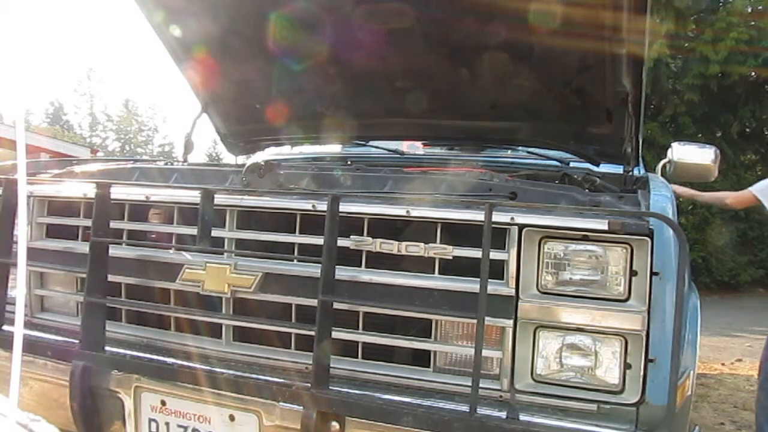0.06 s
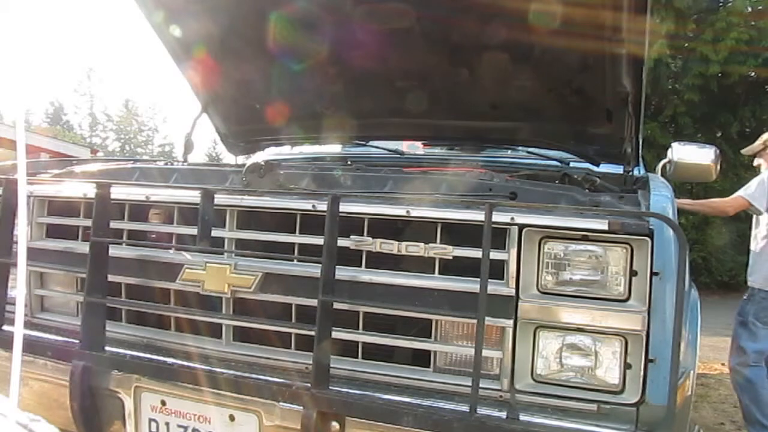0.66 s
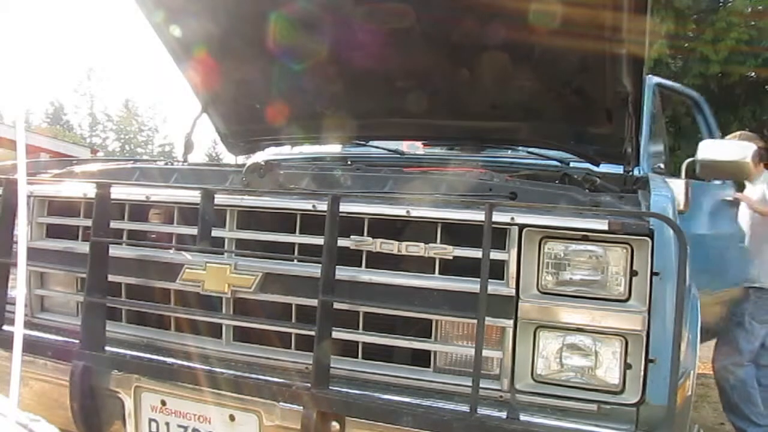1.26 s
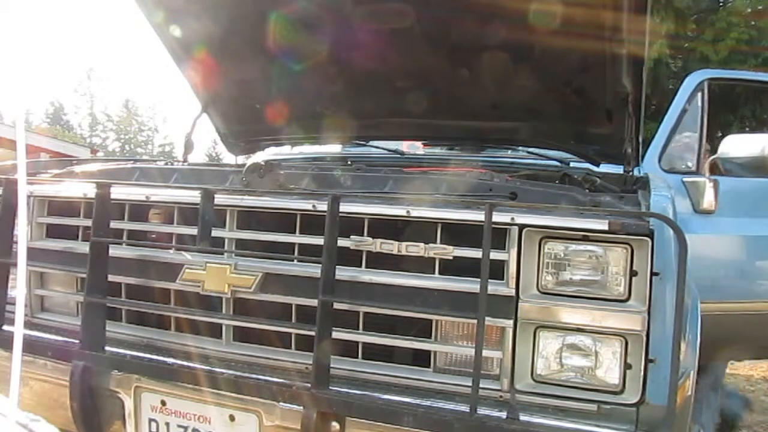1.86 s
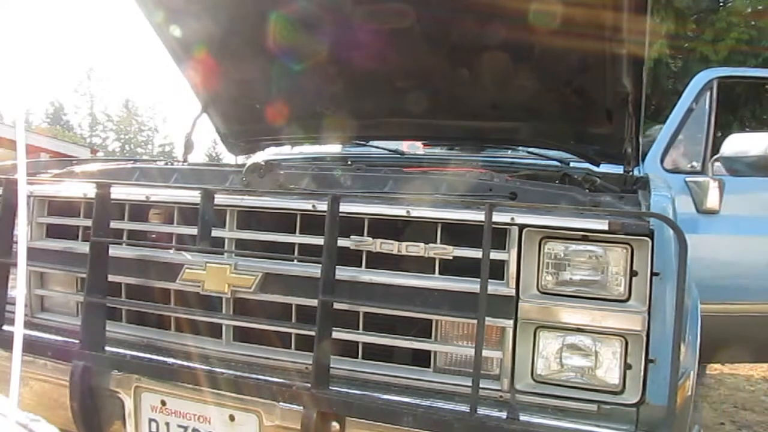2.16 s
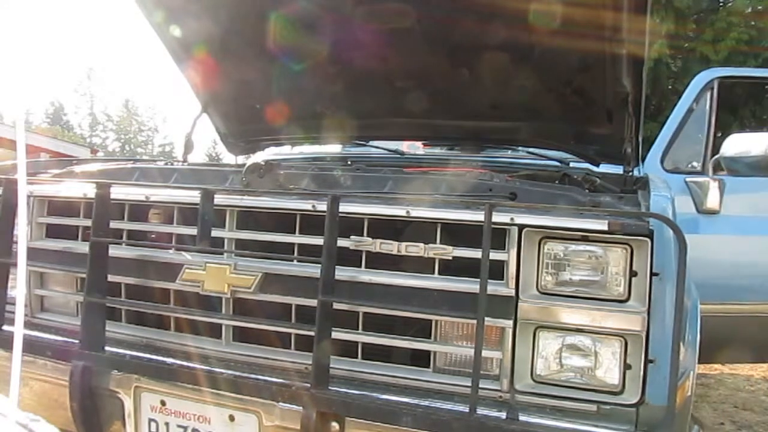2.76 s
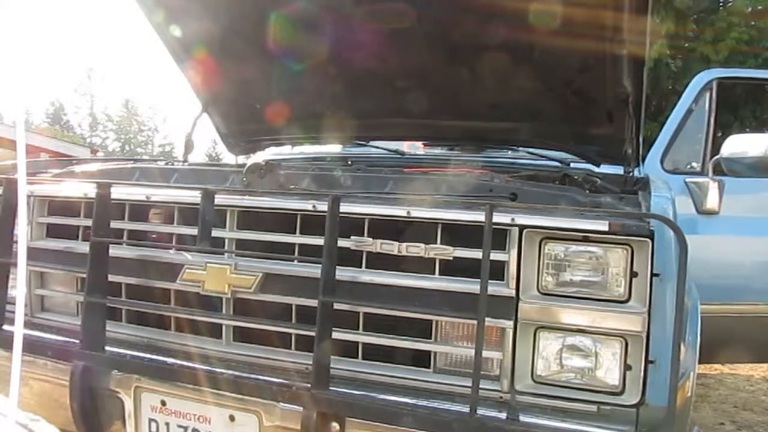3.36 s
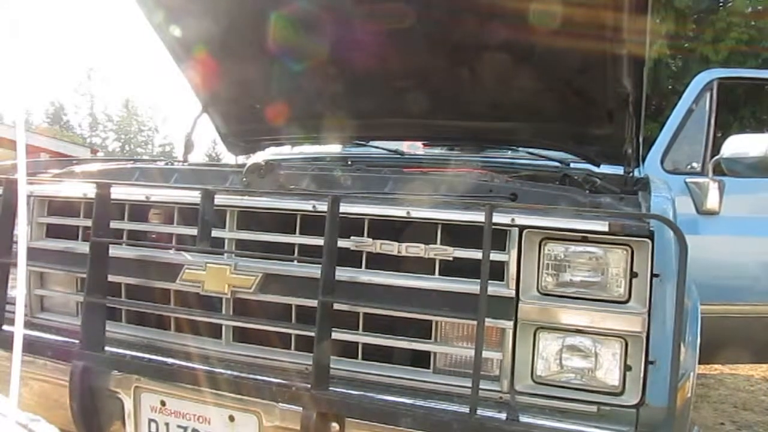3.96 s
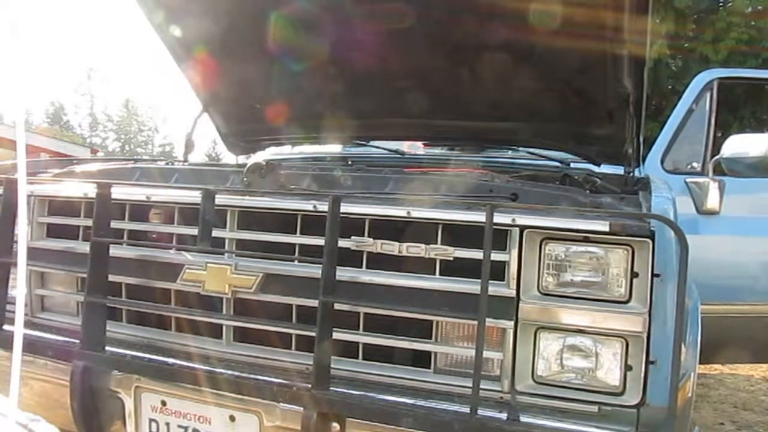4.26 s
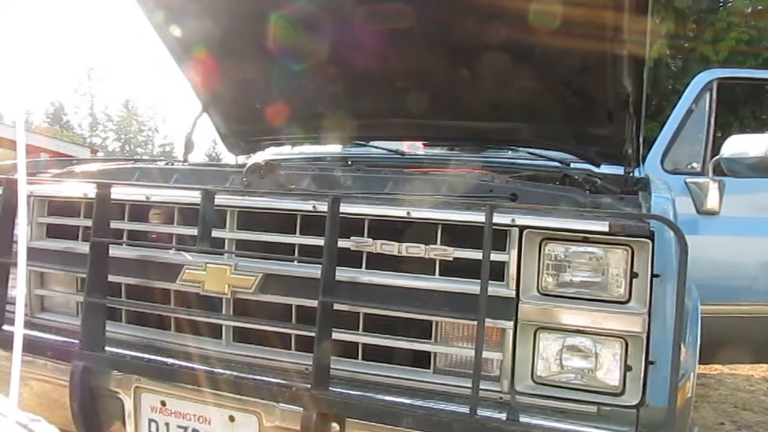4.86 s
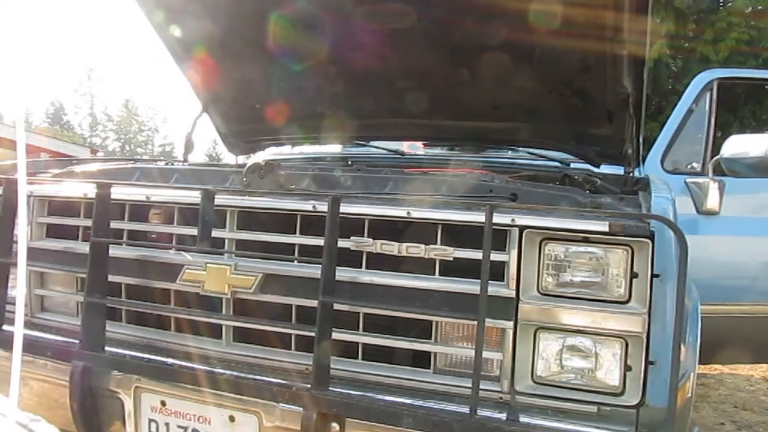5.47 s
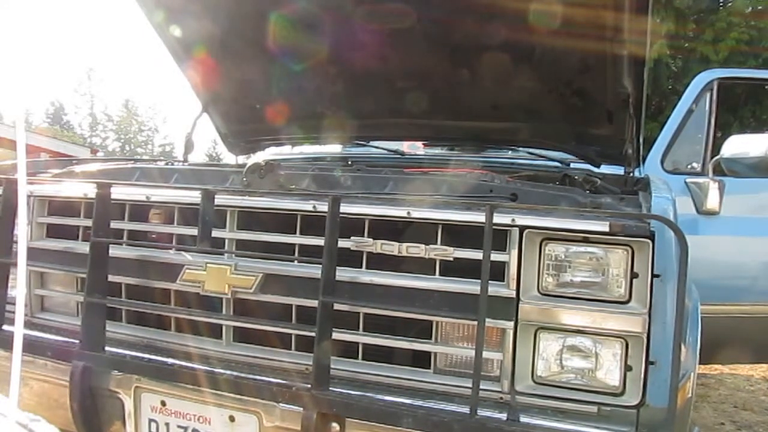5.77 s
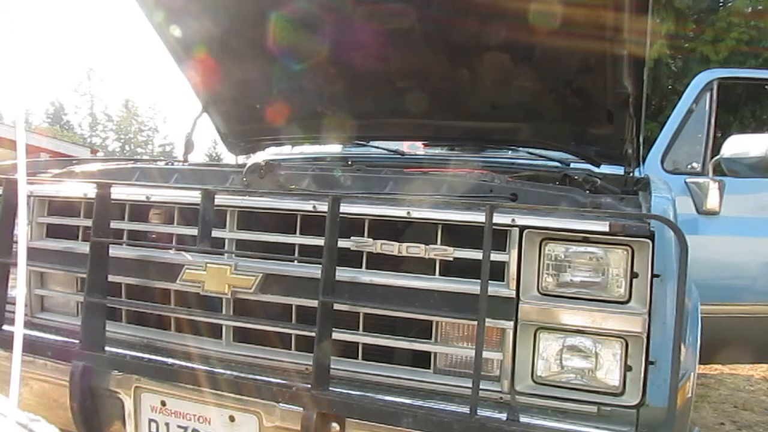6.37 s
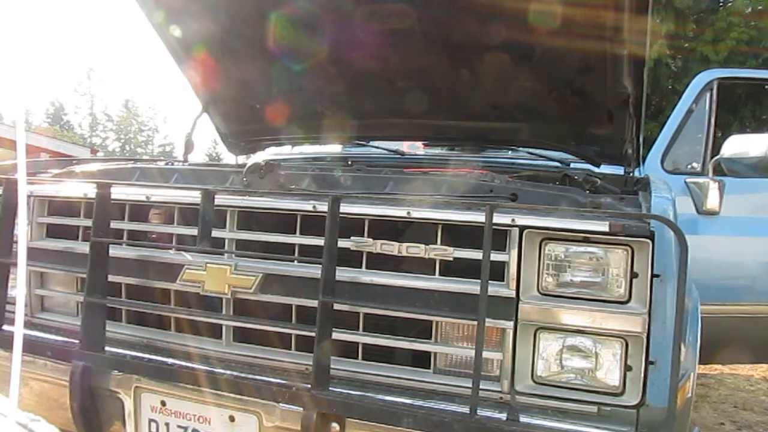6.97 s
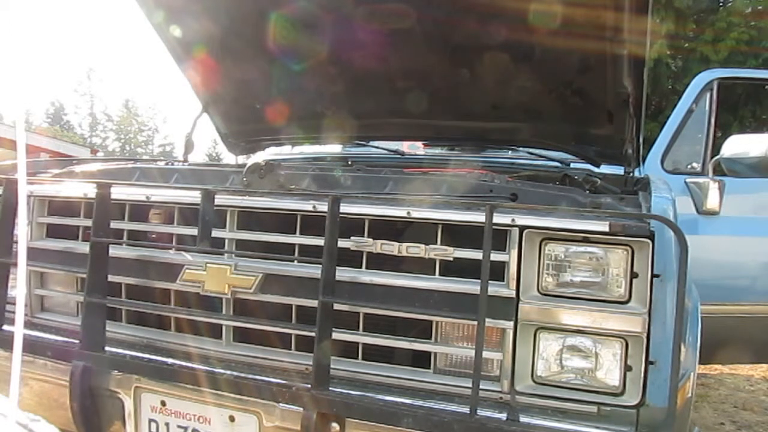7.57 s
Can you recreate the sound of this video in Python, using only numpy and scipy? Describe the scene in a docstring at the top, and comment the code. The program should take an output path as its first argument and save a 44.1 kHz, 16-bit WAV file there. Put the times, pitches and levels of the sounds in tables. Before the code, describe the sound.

A faint outdoor hiss runs throughout, heard from in front of an old pickup. At about 0.6 seconds the door handle clicks, and at 0.8 the latch scrapes free with a bright metallic chirp. From 1.2 to 1.7 seconds the dry hinge gives two high, wavering squeals, slightly to the right, then drops into a lower, rasping groan that stops at 2.1. Light, scattered knocks and clicks come from the door and cab until about 4.9 seconds, some with a brief ring of loose metal, and a soft, dull scuff passes around 4.2. At 5.6 seconds a catch snaps once, sharp, dry and close, the loudest sound of all. A faint squeak follows at 6.1 as a light breeze nudges the microphone with low, soft bumps. Hiss remains, with one more small puff near 7.5 seconds.

```python
"""An old pickup's door opens outdoors, heard from in front of the bonnet, over hiss and a light breeze.
The handle clicks and the latch scrapes free (0.8 s). The dry hinge squeals twice (1.2-1.7 s), then
drops into a slower stick-slip groan that shakes the panel and stops (2.1 s). Door and cab knock, loose
fittings ring, and a soft scuff passes (4.2 s). A catch snaps, sharp and close (5.6 s); a faint squeak
follows (6.1 s) as the breeze nudges the microphone."""
import sys
import numpy as np
from scipy import signal
from scipy.fft import rfft, irfft, next_fast_len
from scipy.io import wavfile
from scipy.ndimage import uniform_filter1d, map_coordinates

SR = 44100
rng = np.random.default_rng(int(sys.argv[2]) if len(sys.argv) > 2 else 0)


def pcm_store(signal):
    """Save signal as 16-bit PCM."""
    levels = np.round(np.clip(np.atleast_2d(signal), -1, 1) * 32767)
    wavfile.write(sys.argv[1], SR, levels.astype(np.int16).T)


N = 335437

# hinge stick-slip: time_s, slip_rate_hz, roughness (0-1)
GROAN_CURVE = [(1.715, 451, .8), (1.765, 425.5, 0), (1.846, 401.5, 0.05), (1.853, 322.4, .6),
               (1.889, 311.4, 0.12), (1.96, 316.2, 0.04), (1.982, 334.8, 0.84), (2.025, 309.5, .9),
               (2.034, 468, 0.5), (2.116, 478, 0.41)]


def amp(db):
    """Decibels to gain."""
    return 10 ** (np.asarray(db) / 20)


def unit(x):
    """Scale to rms 1."""
    return x / np.sqrt(np.mean(x ** 2) + 1e-20)


def steady(x):
    """Scale to a running rms of 1."""
    return x / np.sqrt(np.abs(uniform_filter1d(x ** 2, size=700)) + 1e-12)


def along(points, hz):
    """Interpolate (freq_hz, value) points on a log axis."""
    freq_hz, values = np.transpose(points)
    return np.interp(np.log(hz + 1), np.log(freq_hz + 1), values)


def curves(rows):
    """One value per sample for each column after time_s."""
    time_s, *columns = np.transpose(rows)
    return [np.interp(np.arange(N) / SR, time_s, column) for column in columns]


def during(rows):
    """True between a table's first and last time."""
    t = np.arange(N) / SR
    return (t > rows[0][0]) & (t < rows[-1][0])


def wobble(rate_hz):
    """Smooth random curve with knots at rate_hz."""
    knots = rng.standard_normal(int(N * rate_hz / SR) + 4)
    return map_coordinates(knots, [np.arange(N) * rate_hz / SR])


def filtered(x, response):
    """Apply a complex frequency response."""
    n = x.shape[-1]
    size = next_fast_len(n + 8192)
    return irfft(rfft(x, size) * response(np.fft.rfftfreq(size, 1 / SR)), size)[..., :n]


def coloured(x, colour):
    """Shape by (freq_hz, gain_db) points."""
    return filtered(x, lambda hz: amp(along(colour, hz)))


def noise(colour, size):
    """Coloured noise, rms 1."""
    return unit(coloured(rng.standard_normal(size), colour))


def dying(x, decay):
    """Decay each band by (freq_hz, t60_s) points."""
    hz, t, bands = signal.stft(x, SR, nperseg=128)
    return signal.istft(bands * amp(-60 * t / along(decay, hz)[:, None]), SR)[1][..., :x.shape[-1]]


def add(track, start_s, sound):
    """Mix a sound into a track."""
    start = round(start_s * SR)
    track[start:start + len(sound)] += sound[:N - start]


def placed(x, left_db, lag_samples):
    """Pan by the left channel's level and lag against the right."""
    ports = np.array([[.5], [-.5]])
    return filtered(x, lambda hz: amp(ports * left_db) * np.exp(-2j * np.pi * hz * ports * lag_samples / SR))


def air(hiss_db=-52.5):
    """Distant trees and roads: low wash and hiss, narrowest in the midrange."""
    # wash over time: time_s, level_db
    wash_curve = [(0, -56), (1, -52.5), (2.3, -50), (3.5, -54.5), (4.3, -55.5), (7.61, -59)]
    # spectra: freq_hz, gain_db
    wash_colour = [(30, -69), (120, -41.5), (250, -15.5), (450, -6.5), (750, 1), (1300, -1), (1700, -10),
                   (3000, -60.5), (7000, -120)]
    hiss_colour = [(710, -25.5), (1200, -11.5), (1340, -5), (1440, -2), (1560, -2.5), (2180, -0.5),
                   (3250, -6), (3910, -16), (4700, -9.5), (7250, -15), (9410, -25), (13700, -47),
                   (16000, -77)]
    # stereo width: freq_hz, side_to_mid_db
    width = [(200, -1), (400, -5.5), (700, -7.5), (1300, -6), (2400, -8.5), (4400, -6.5), (8000, -2),
             (14000, 4.5)]

    def wide(colour):
        return noise(colour, N) + np.outer([1, -1], coloured(noise(colour, N), width))

    wash_db, = curves(wash_curve)
    hiss = coloured(wide(hiss_colour), [(100, -30.5), (600, 0)])
    return wide(wash_colour) * amp(wash_db + 0.37 * wobble(5.7)) + hiss * amp(hiss_db)


def rumble_gain(return_db_per_s=12.5, edge_s=0.03, floor_db=-70.5):
    """Wind rumble cuts out after a strong buffet, then slowly returns, like an automatic wind filter."""
    # stretches of rumble: cut_s, length_s, final_db
    stretches = [(.99, 1, -44.5), (4.44, 1.66, -41.5), (4.64, 0.09, -54), (6.39, 1.4, -43.5),
                 (7.5, 0.5, -61.5)]
    t, gain = np.arange(N) / SR, amp(floor_db)
    for cut_s, length_s, final_db in stretches:
        gate = np.clip(np.minimum(t - cut_s + length_s, cut_s - t) / edge_s + 1, 0, 1)
        gain = gain + gate * amp(final_db - return_db_per_s * np.abs(cut_s - t))
    return gain


def breeze(lumps_db=2.5, mid_flutter_db=-9, dip_gain=0.17):
    """Flutter and single eddies push the two microphone ports, mostly in opposite directions."""
    # wind spectrum: freq_hz, gain_db
    flutter_colour = [(20, -13), (60, -1), (130, 0.5), (300, -3), (550, -12.5), (1000, -26), (2500, -42.5),
                      (6000, -120)]
    # strongest eddies: centre_s, peak_db, freq_hz
    eddies = [(0.981, -29, 89.5), (4.428, -31.5, 60.3), (6.09, -27, 79), (6.149, -24.5, 108),
              (6.365, -23, 112), (7.49, -28.5, 94)]
    gain = rumble_gain() * amp(lumps_db * wobble(30))
    t = np.arange(-SR // 20, SR // 20) / SR
    pushes, dips = np.zeros((2, N))
    for centre_s, peak_db, hz in eddies:
        u = 2 * np.pi * hz * t
        bell = amp(peak_db) * np.exp((1 - u * u) / 2)
        add(pushes, centre_s + t[0], -u * bell)  # push, then suction
        add(dips, centre_s + t[0], (1 - u * u) * bell)  # pressure dip at both ports
    side = gain * noise(flutter_colour, N) + pushes
    mid = gain * noise(flutter_colour, N) * amp(mid_flutter_db) + dip_gain * dips
    return np.array([mid + side, mid - side])


def yard(x):
    """Truck body, ground and trees scatter a short stereo tail."""
    # tail decay: freq_hz, t60_s
    decay = [(200, 0.17), (1500, 0.28), (6000, 0.13), (14000, 0.076)]
    tail = dying(rng.standard_normal((2, SR // 3)), decay)
    delayed = np.pad(x, (200, 0))
    mid, side = signal.fftconvolve(delayed[None], tail / np.linalg.norm(tail[0]), axes=1)[:, :N]
    return np.array([mid + 0.67 * side, mid - 0.18 * side])


def scuff(centre_s=4.2, sigma_s=0.17, level_db=-51):
    """A dull rub swells and fades."""
    # rub spectrum: freq_hz, gain_db
    colour = [(100, -12), (300, 1), (650, -1), (1100, -10), (3000, -41)]
    t = np.arange(N) / SR
    return noise(colour, N) * amp(level_db) * np.exp(-((t - centre_s) / sigma_s) ** 2 / 2)


def steel_mode(hz, spread_hz, rise_s, t60_s):
    """One steel mode of unsteady pitch swells and dies."""
    t = np.arange(SR // 2) / SR
    drift = unit(uniform_filter1d(rng.standard_normal(len(t)), size=36))
    phase = 2 * np.pi * np.cumsum(hz + spread_hz * drift) / SR
    envelope = np.minimum(t / rise_s, 1) ** 2 * amp(-60 * np.maximum(t - rise_s, 0) / t60_s)
    return np.sin(phase) * envelope


def rings(squeak_s=6.09, squeak_hz=3040, squeak_db=-50):
    """Jolted fittings and panels ring briefly; one squeaks faintly for longer."""
    # loose steel: start_s, pitch_hz, level_db
    modes = [(1.161, 8900, -32.5), (1.382, 5000, -31), (1.394, 575, -37), (1.478, 530, -39.5),
             (2.172, 131, -39), (2.819, 2420, -37), (3.148, 1090, -38.5), (3.148, 1880, -39),
             (4.626, 913, -38.5)]
    out = np.zeros(N)
    for start_s, hz, db in modes:
        add(out, start_s, amp(db) * steel_mode(hz, spread_hz=47 + 0.029 * hz, rise_s=0.0052, t60_s=0.09))
    add(out, squeak_s, amp(squeak_db) * steel_mode(squeak_hz, spread_hz=75, rise_s=0.058, t60_s=1.0))
    return out


def contact(levels_db, rise_s, middle_t60_s):
    """One contact stirs dense, damped door modes in three bands; the lowest lasts longest."""
    # band spectra: freq_hz, gain_db
    treble = [(1800, -9.5), (3000, -0.5), (4000, -5.5), (5500, 0.5), (8000, -5.5), (10000, -15),
              (13000, -32), (16000, -35)]
    middle = [(120, -52), (300, -17), (620, -2.5), (850, 2), (1100, -0.5), (1450, -1), (1850, -4),
              (2300, -3.5), (3000, -6.5), (4200, -26), (9000, -80)]
    thud = [(40, -20), (130, -4), (300, 0.5), (500, -2), (1000, -4), (5000, -100)]
    t = np.arange(SR // 3) / SR
    bands = zip((treble, middle, thud), levels_db, middle_t60_s * np.array([0.82, 1, 1.6]))
    modes = sum(noise(colour, len(t)) * amp(db - 60 * t / t60_s) for colour, db, t60_s in bands)
    return modes * (1 - np.exp(-t / rise_s))


def knocks(chatter_db=1.5):
    """Hard clicks and softer knocks, all chattering."""
    # handle and latch: start_s, treble_db, middle_db
    clicks = [(.102, -45, -60), (0.332, -48.5, -51), (0.5584, -19, -34), (.567, -48, -27.5),
              (2.817, -37.5, -34), (4.662, -34, -44), (5.632, -36, -55)]
    # door and cab: start_s, treble_db, middle_db, thud_db
    dull_knocks = [(.42, -47, -42.5, -55), (.474, -43, -39, -55), (.809, -36, -35, -34.5),
                   (.983, -44, -45, -47), (1.06, -36.5, -30, -56), (1.387, -33.5, -36.5, -56),
                   (1.478, -60, -37, -58), (2.168, -47, -39, -40), (2.183, -45, -31.5, -56),
                   (2.532, -50, -39, -60), (2.638, -60, -36.5, -72), (2.839, -44.5, -38.5, -74),
                   (3.148, -33, -35.5, -52), (3.443, -33.5, -40, -59), (3.459, -34.5, -35.5, -41),
                   (4.112, -49, -55, -42), (4.623, -31, -28.5, -46.5), (4.885, -46, -43, -69)]
    out = np.zeros(N)
    for start_s, *levels_db in clicks:
        add(out, start_s, contact(levels_db, rise_s=0.00035, middle_t60_s=0.047))
    for start_s, *levels_db in dull_knocks:
        add(out, start_s, contact(levels_db, rise_s=0.0027, middle_t60_s=0.082))
    return out * amp(chatter_db * wobble(600))


def latch(start_s=.8085, pitch_hz=5800, level_db=-15, lead_s=.009, scrape_db=-23, tail_db=-27):
    """The latch scrapes, lets go with a bright chirp and rings on, with its octave."""
    out = np.zeros(N)
    add(out, start_s - lead_s, amp(scrape_db) * steel_mode(5100, spread_hz=330, rise_s=.003, t60_s=0.074))
    for harmonic, db in (1, 0), (2, -18):
        chirp = steel_mode(harmonic * pitch_hz, spread_hz=harmonic * 170, rise_s=0.0038, t60_s=0.021)
        tail = steel_mode(harmonic * pitch_hz, spread_hz=harmonic * 210, rise_s=0.0038, t60_s=0.32)
        add(out, start_s, amp(db) * (chirp + amp(tail_db) * tail))
    return amp(level_db) * out


def snap(start_s=5.5829, rise_s=0.0001, crack_db=1, crack_t60_s=0.0096, ring_db=-11):
    """A hard catch snaps close by: a bright crack, then a short dense ring."""
    # spectra: freq_hz, gain_db
    crack_colour = [(1500, -25), (3000, -4), (4100, -10), (5500, 0), (7400, 2), (9000, 2), (10200, -4),
                    (11500, -13), (16000, -30)]
    ring_colour = [(60, -22), (200, -7), (350, -9), (700, -18), (1150, -16), (1500, -5), (2000, -14),
                   (2800, 1), (3400, 3), (4100, -13), (5000, 0), (8900, 0), (11000, -12), (16000, -35)]
    # ring decay: freq_hz, t60_s
    ring_decay = [(250, 0.16), (1200, 0.093), (3000, 0.073), (5000, 0.0556), (9000, 0.0516), (15000, 0.078)]
    # steel modes of the catch: pitch_hz, level_db
    modes = [(1500, -24), (2730, -21), (3420, -18.5)]
    out, t = np.zeros(N), np.arange(SR // 4) / SR
    crack = noise(crack_colour, len(t)) * amp(crack_db - 60 * t / crack_t60_s)
    ring = dying(noise(ring_colour, len(t)), ring_decay) * amp(ring_db)
    add(out, start_s, (crack + ring) * (1 - np.exp(-t / rise_s)))
    for hz, db in modes:
        add(out, start_s, amp(db) * steel_mode(hz, spread_hz=50, rise_s=.001, t60_s=0.058))
    return out


def slips(rate_hz):
    """Phase and band-limited pulse train of a stick-slip contact."""
    phase = 2 * np.pi * np.cumsum(rate_hz) / SR
    harmonics = np.floor(SR / 2 / rate_hz) - 1
    return phase, np.sin((harmonics + .5) * phase) / (2 * np.sin(phase / 2) + 1e-12) - .5


def hinge_plate(x, ring_db):
    """The plate rings for milliseconds after each slip."""
    impulse = dying(rng.standard_normal(SR // 20), [(3000, .022), (10000, .016)])
    ring = signal.fftconvolve(x, impulse / np.linalg.norm(impulse))[:N]
    return (x + amp(ring_db) * ring) / np.hypot(1, amp(ring_db))


def rust(x, depth_db=3.2):
    """The contact travels over rust, so partials swell and fade independently."""
    bands = signal.stft(x, nperseg=256)[2]
    field = uniform_filter1d(rng.standard_normal(bands.shape), size=6, axis=0)
    field = uniform_filter1d(field, size=16, axis=1)
    return signal.istft(bands * amp(depth_db * unit(field)))[1][:N]


def groan_levels(attack_s=0.029, release_s=0.055, fade_db=30, sag_db_per_s=13, bite_db=13.5, bite_s=0.051):
    """The panel level sags as the door slows; the rasp bites hard, then settles."""
    t = np.arange(N) / SR
    age_s, left_s = t - GROAN_CURVE[0][0], GROAN_CURVE[-1][0] - t
    attack, release = np.clip([age_s / attack_s, left_s / release_s], 0, 1) - 1
    bite = np.exp(-np.maximum(age_s, 0) / bite_s)
    panel_db = -25 - sag_db_per_s * np.maximum(age_s, 0) + fade_db * (attack + release)
    rasp_db = -39 + bite_db * bite + fade_db * (attack + 1.4 * release)
    return panel_db, rasp_db, bite


def door_panel(pulses):
    """Slips shake the panel's resonances, alternating in sign."""
    # resonances: centre_hz, width_hz, gain_db
    modes = [(365, 124, -8.5), (690, 70, 0), (932, 81, 0), (1226, 154, 1), (1433, 61, -4.5),
             (1600, 103, -7.5), (2143, 62, -9)]

    def response(hz):
        return sum((-1) ** k * amp(db) * 1j * hz * width_hz / (centre_hz ** 2 - hz ** 2 + 1j * hz * width_hz)
                   for k, (centre_hz, width_hz, db) in enumerate(modes))

    colour = [(120, -32), (300, 2), (680, 4), (850, -1.5), (940, 4), (2200, 6.0), (3500, -9)]
    return coloured(filtered(pulses, response), colour)


def groan(jitter=.1, scatter_db=4):
    """As the door slows, the hinge sticks longer; each slip shakes the panel and rasps the steel."""
    # steel slipping evenly, and grinding: freq_hz, gain_db
    even_colour = [(1900, -26), (2450, 0), (3300, -3), (3750, -5), (5100, -0.5), (6200, -8), (7100, -13),
                   (7900, 5), (9400, 8), (10500, -6), (11800, -12), (14000, -42)]
    grind_colour = [(1900, -32), (2350, -4.5), (3150, 2), (3900, -6.5), (5200, -1), (7700, 0), (8600, -2),
                    (10000, -10.5), (12300, -19), (14500, -38)]
    rate_hz, rough = curves(GROAN_CURVE)
    panel_db, rasp_db, bite = groan_levels()
    _, pulses = slips(rate_hz * (1 + jitter * rough * wobble(450)))
    pulses = unit(pulses) * amp(scatter_db * rough * wobble(400))
    pulses += (.1 + .25 * rough) * rng.standard_normal(N)
    steel = rust(hinge_plate(pulses, ring_db=8.5))
    grinding = np.minimum(2 * (rough + bite), 1)  # uneven or biting slips sound duller
    rasp = (1 - grinding) * coloured(steel, even_colour) + grinding * coloured(steel, grind_colour)
    return (steady(door_panel(pulses)) * amp(panel_db) + steady(rasp) * amp(rasp_db)) * during(GROAN_CURVE)


def squeal(clean_hz=1800, rough_span_hz=800, rough_fall_hz_per_s=8000, flutter_db=3):
    """The hinge pin sings on one steel mode, turning rough as the pitch sinks and the grip fails."""
    # one curve per squeal: time_s, pitch_hz, fundamental_db, overtones_db
    glides = [
        [(1.155, 1603, -65, -64), (1.175, 1643, -36.5, -46), (1.205, 1785, -33.5, -46),
         (1.25, 1790, -49.5, -48.5), (1.3, 1770, -26, -39), (1.335, 1578, -35.5, -41.5),
         (1.367, 1414, -23, -38.5), (1.388, 1416, -20, -44.5), (1.405, 1416, -39, -61), (1.47, 1400, -45, -67)],
        [(1.485, 1476, -51, -54), (1.507, 1547, -45, -40.5), (1.517, 1633, -22, -44), (1.55, 1748, -25, -39.5),
         (1.615, 1724, -28.5, -36), (1.632, 1690, -37, -41.5), (1.648, 1613, -28, -31.5),
         (1.69, 1606, -28, -32), (1.725, 1545, -27.5, -34), (1.745, 1390, -42, -66)],
    ]
    # overtone spectrum: freq_hz, gain_db
    overtone_colour = [(2500, -3), (3400, 1.5), (4000, -12.5), (5000, 3.5), (6300, -5.5), (7100, -4),
                       (8500, -1), (10500, -3.5), (12600, -8), (14000, -22), (15500, -62)]
    # favoured band per squeal: centre_hz, width_octaves, boost_db
    favoured = [(10600, 0.34, 0.5), (6200, 0.37, 6)]
    # off the ground and the truck's side: delay_s, gain_db
    reflections = [(.011, -14), (.019, -12)]
    pitch_hz, tone_db, overtones_db = curves(np.concatenate(glides))
    fall_hz_per_s = np.maximum(-np.gradient(pitch_hz) * SR, 0)
    rough = np.clip((clean_hz - pitch_hz) / rough_span_hz + fall_hz_per_s / rough_fall_hz_per_s, 0, 1)
    jitter = 0.0238 * wobble(200) + 0.024 * wobble(1500)
    phase, pulses = slips(pitch_hz * (1 + rough * jitter))
    tone = np.sqrt(2) * np.cos(phase) * amp(tone_db + flutter_db * rough * wobble(150))
    overtones = hinge_plate(rust(pulses - np.cos(phase)), ring_db=-5)
    overtone_gain = amp(overtones_db + flutter_db * rough * wobble(200))
    out = np.zeros(N)
    for glide, (centre_hz, width_octaves, boost_db) in zip(glides, favoured):
        def response(hz):
            band = np.exp(-(np.log2((hz + 1) / centre_hz) / width_octaves) ** 2)
            return amp(along(overtone_colour, hz) + boost_db * band)

        out += (tone + steady(filtered(overtones, response)) * overtone_gain) * during(glide)
    # reflections carry the earlier pitch, so glides beat
    return out + sum(amp(db) * np.pad(out, (round(delay_s * SR), 0))[:N] for delay_s, db in reflections)


def scene():
    """The door stands slightly right; the snap is close and almost dry."""
    hinge = squeal() + groan()
    fittings = knocks() + rings() + latch() + scuff()
    catch = snap()
    direct = (placed(hinge, left_db=-1.4, lag_samples=1.13)
              + placed(fittings, left_db=-1.5, lag_samples=0.98)
              + placed(catch, left_db=-0.5, lag_samples=0.52))
    echo = yard(amp(-14) * hinge + amp(-12.5) * fittings + amp(-29.5) * catch)
    return direct + echo + air() + breeze()


def record(dry):
    """Clip at full scale, then low-pass steeply."""
    cutoff_hz = 15750
    return filtered(np.clip(dry, -1, 1), lambda hz: 1 / np.sqrt(1 + (hz / cutoff_hz) ** 120))


dry = scene()
out = record(dry)
pcm_store(out)
```